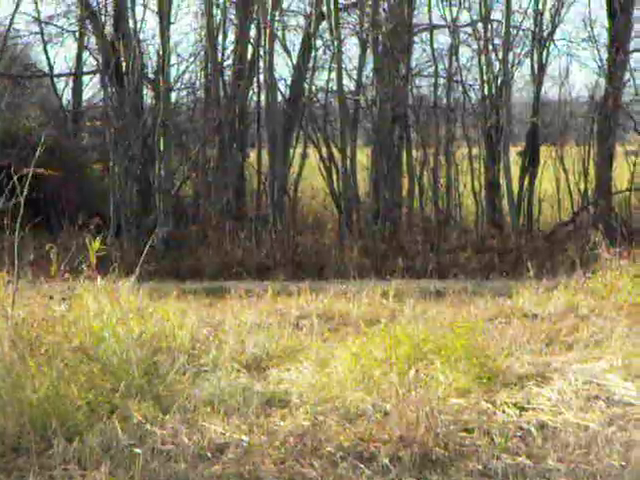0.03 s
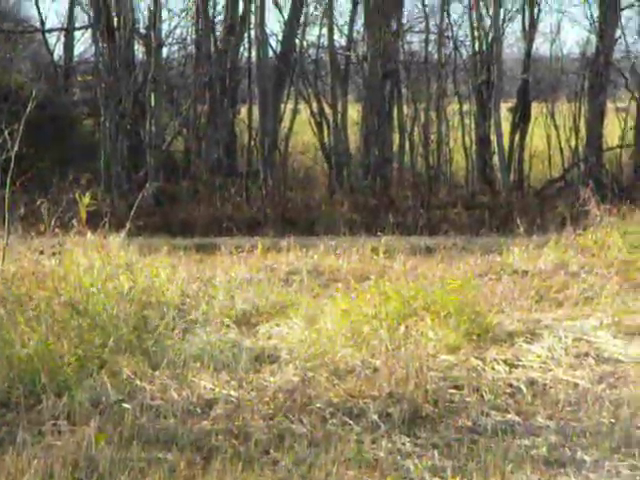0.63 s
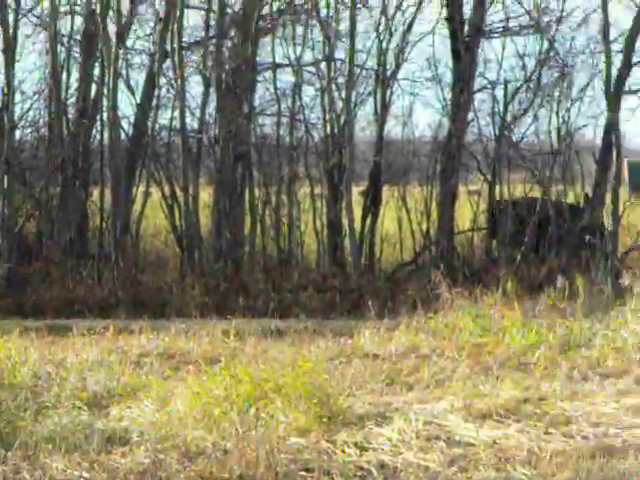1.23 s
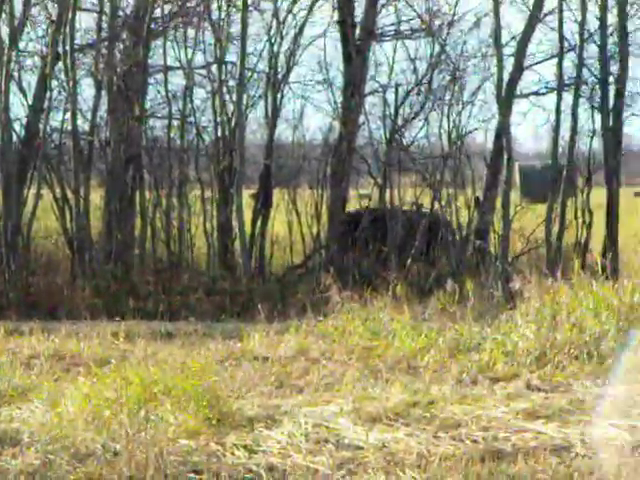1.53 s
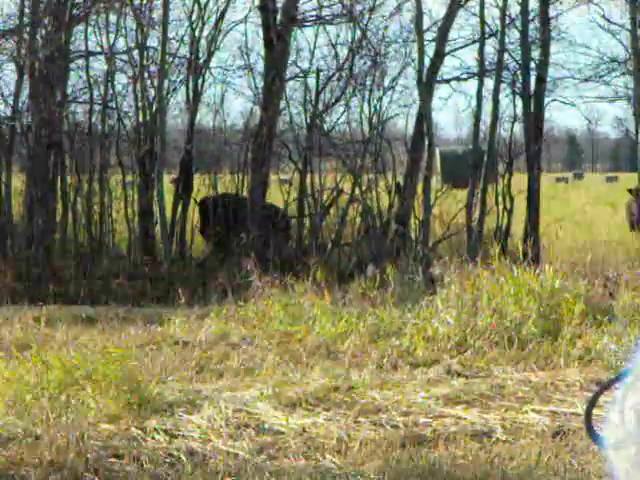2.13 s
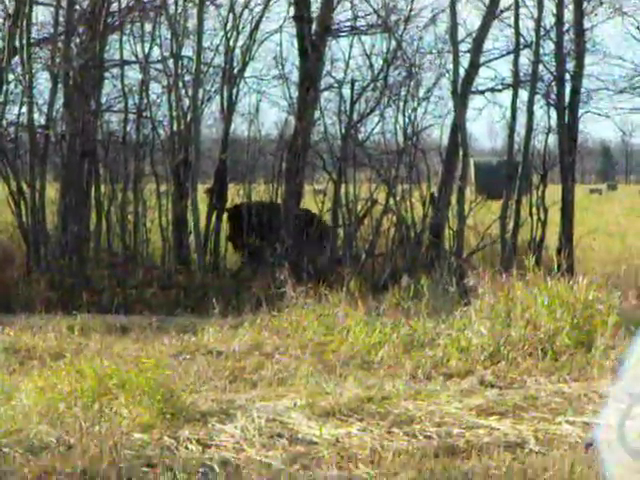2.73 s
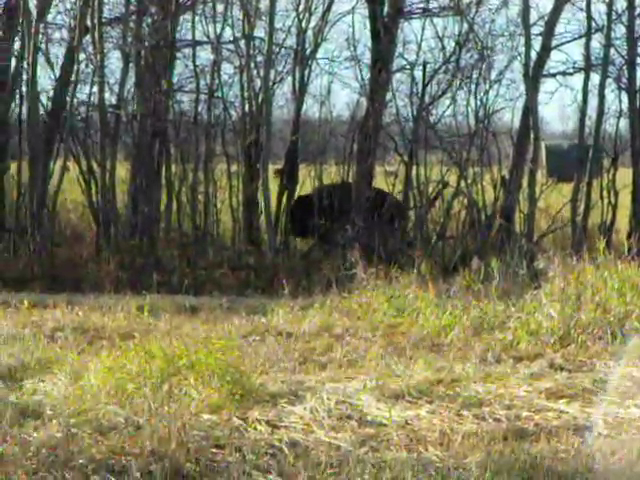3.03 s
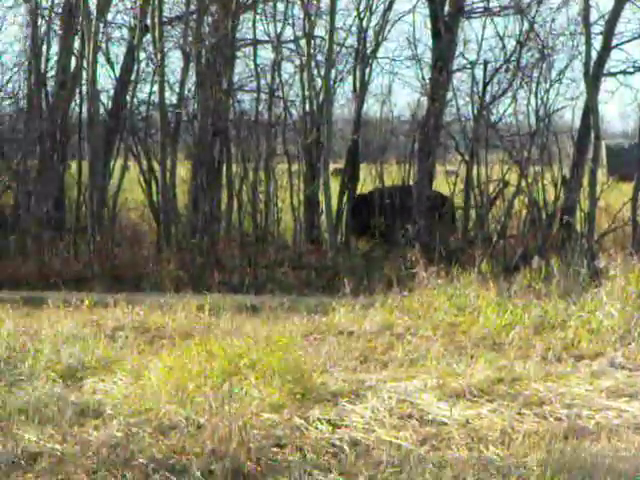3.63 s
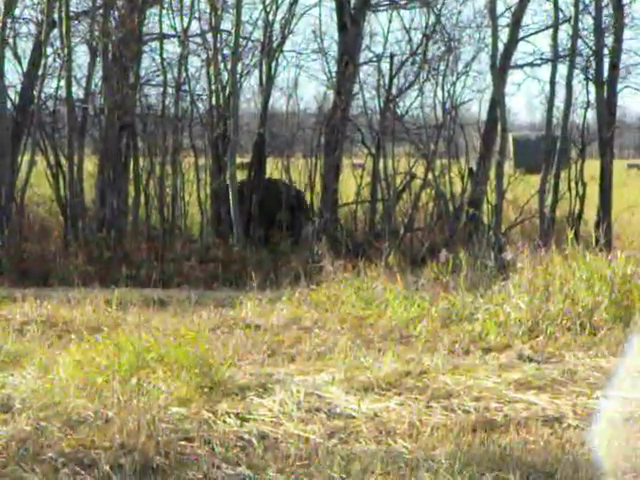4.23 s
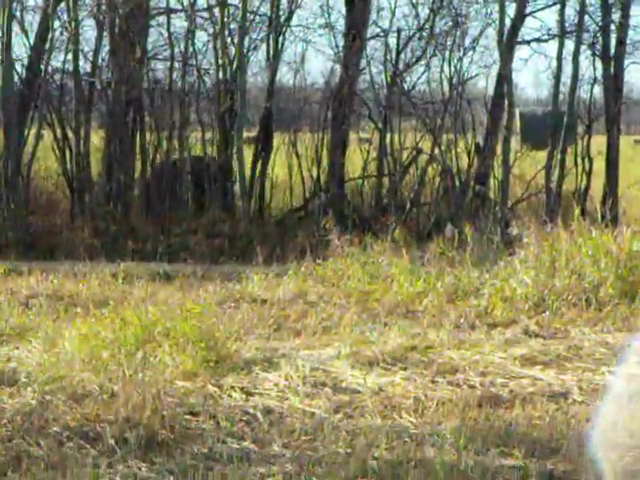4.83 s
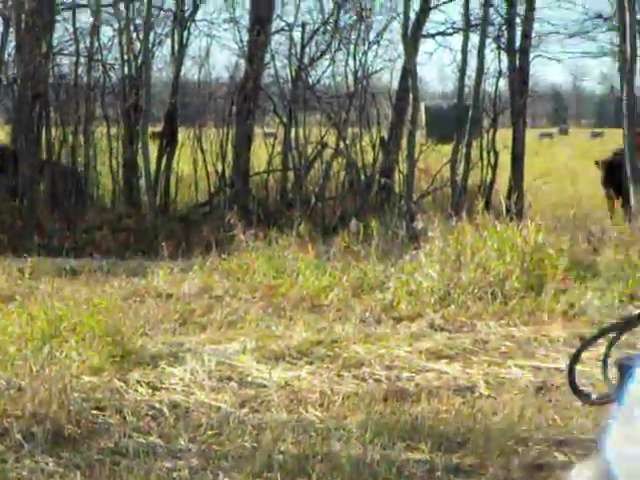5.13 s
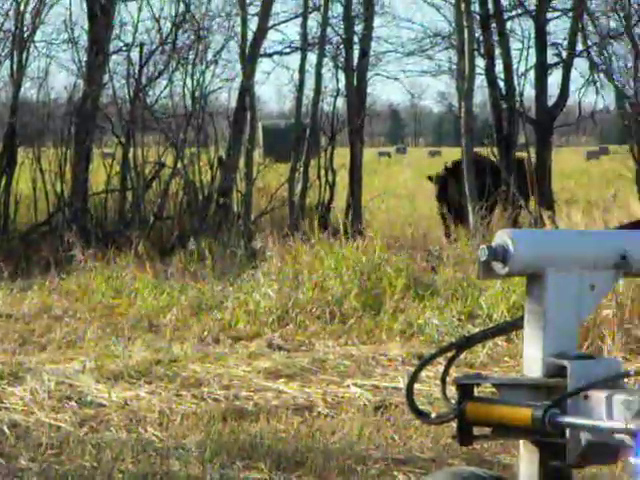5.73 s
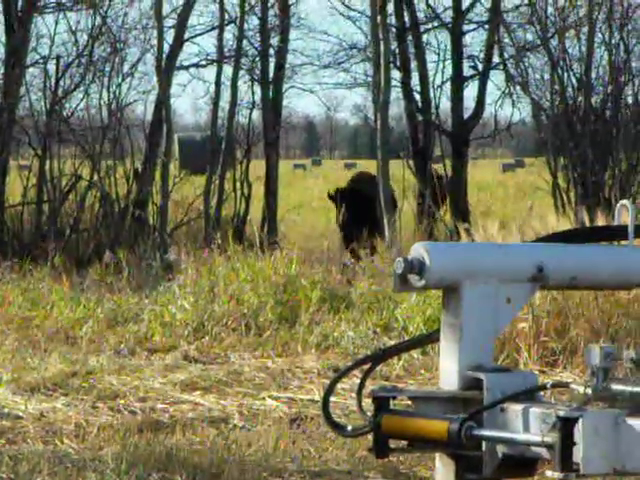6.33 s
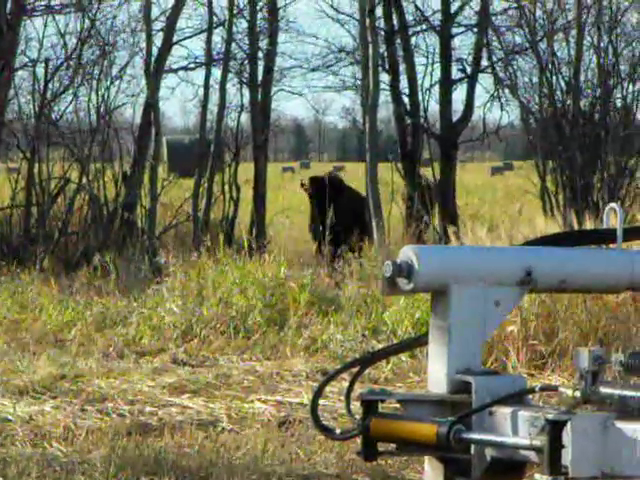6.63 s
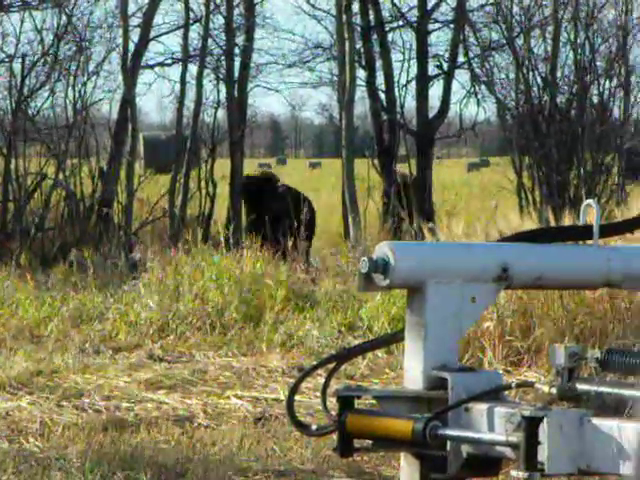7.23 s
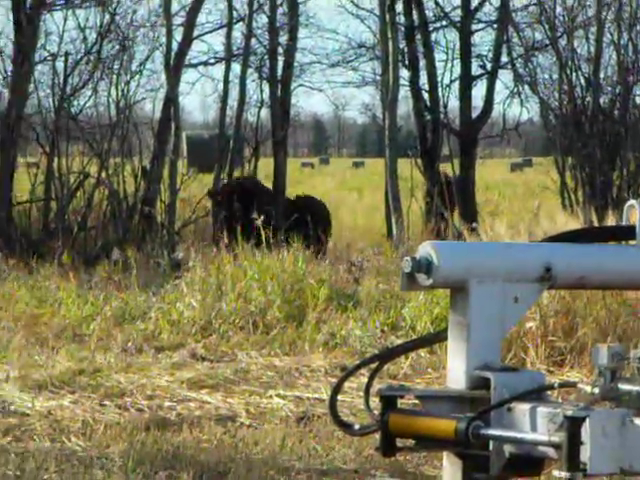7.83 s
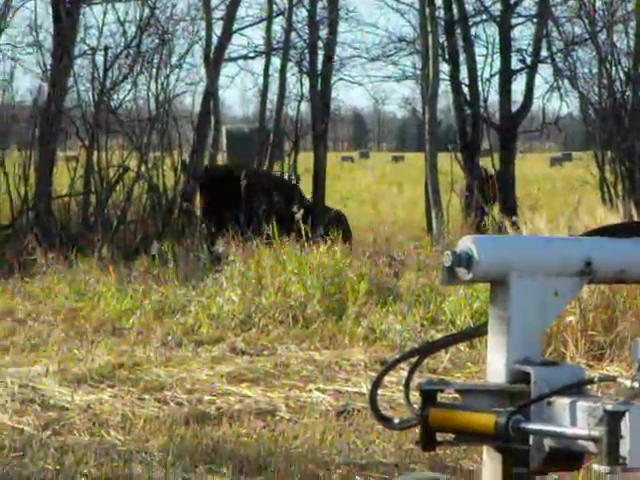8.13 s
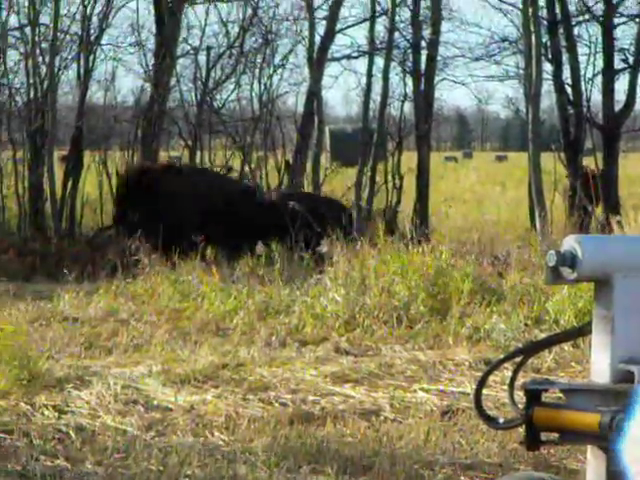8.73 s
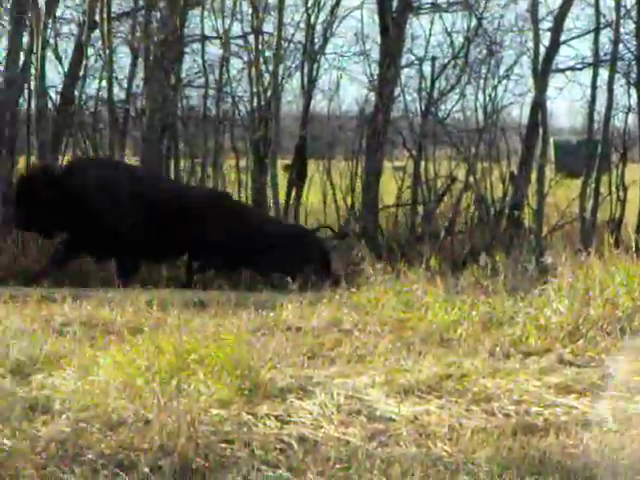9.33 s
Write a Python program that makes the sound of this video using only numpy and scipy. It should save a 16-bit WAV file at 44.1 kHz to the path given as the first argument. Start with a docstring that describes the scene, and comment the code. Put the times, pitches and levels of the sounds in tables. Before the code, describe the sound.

Constant, slightly buzzy microphone hiss and a faint high whine nearly cover a quiet open field, where light air rumbles now and then. A pop and a quick cluster of plastic clicks open the sound, right at the hand-held camera. Scattered ticks and small finger scuffs follow, then a catch snaps hard enough to distort. The second half holds only hiss, gentle gusts and one tiny squeak. Everything is dry, with dulled treble.

```python
"""A sharp pop as a small hand-held camera wakes, then its own hiss, which nearly covers a still field.
The hiss dips once for each half-picture the camera scans, which gives it a faint buzz,
and a thin electronic whine rides on it. Light air rumbles now and then. Fingers make the
plastic case tick and creak, and once a catch snaps hard enough to overload the input."""
import sys
import numpy as np
from scipy import signal
from scipy.fft import rfft, irfft, next_fast_len
from scipy.io import wavfile

SR = 44100
rng = np.random.default_rng(int(sys.argv[2]) if len(sys.argv) > 2 else 0)


def put_to_file(sound):
    """Save the sound as 16-bit audio at rate SR, in the file named by the first command-line argument."""
    columns = np.atleast_2d(sound).T  # one column per channel
    safe = np.clip(columns, -1, 1)
    whole_steps = np.round(safe * 32767)
    wavfile.write(sys.argv[1], SR, whole_steps.astype(np.int16))


N = 418509
T = np.arange(N) / SR


def amp(db):
    """Turn decibels into a gain to multiply by."""
    return 10 ** (np.asarray(db) / 20)


def tone_curve(points, hz):
    """Gain at hz, read from a curve through (pitch_hz, level_db) points."""
    pitch_hz, level_db = np.transpose(points)
    return amp(np.interp(np.log(hz + 1), np.log(pitch_hz + 1), level_db))


def band(hz, centre_hz, octaves):
    """Gain that is flat around a centre pitch and falls away on both sides."""
    return 1 / np.sqrt(1 + (np.log2((hz + 1) / centre_hz) / octaves) ** 6)


def filtered(sound, gain_at):
    """Turn each frequency of a sound up or down by gain_at(hz)."""
    size = next_fast_len(len(sound) + SR // 10)
    gains = gain_at(np.fft.rfftfreq(size, 1 / SR))
    return irfft(rfft(sound, size) * gains, size)[:len(sound)]


def noise(gain_at, size):
    """Noise shaped by gain_at(hz), with an average (rms) level of 1."""
    shaped = filtered(rng.standard_normal(size), gain_at)
    return shaped / np.sqrt(np.mean(shaped ** 2) + 1e-20)


def fade(t, fade_s):
    """Die away by 60 dB every fade_s seconds."""
    return np.exp(-np.log(1000) * t / fade_s)


def add(track, start_s, sound):
    """Mix a sound into the track at start_s."""
    part = track[round(start_s * SR):][:len(sound)]
    part += sound[:len(part)]


def air(calm_db=-58.5, rise_s=0.16, fall_s=0.2, start_s=0.04):
    """Puffs of air reach the microphone as soft, low swells over a steady drift."""
    # the puffs: peak_s, level_db
    puffs = [(1.72, -48), (5.62, -45), (6.92, -51.5), (7.97, -46), (8.93, -49)]
    # the tone of the rumble: pitch_hz, level_db
    rumble_tone = [(20, -14.5), (55, -9), (85, -3.5), (145, -3.5), (230, -11), (370, -5.5), (480, -19),
                   (1500, -20), (4000, -47.5)]
    power = amp(calm_db) ** 2
    for peak_s, level_db in puffs:
        width_s = np.where(T < peak_s, rise_s, fall_s)
        swell = amp(level_db) * np.exp(-((T - peak_s) / width_s) ** 2)
        power = power + swell ** 2
    rumble = noise(lambda hz: tone_curve(rumble_tone, hz), N)
    return np.sqrt(power) * rumble * (T > start_s)


def camera_hiss(level_db=-38.5, scan_hz=59.94, dip_share=0.085, dip_db=-11, waking_db=-11):
    """The circuits hiss and whine; the hiss dips briefly between scans, so it buzzes."""
    # the tone of the hiss: pitch_hz, level_db
    hiss_tone = [(20, 1), (150, 0), (600, 0.5), (1500, 0.7), (3000, 0.3), (5000, 0.5), (8000, 0)]
    # steady whistles of the electronics: pitch_hz, level_db
    whistles = [(701, -67), (5012, -55), (6014, -58)]
    top_hz = hiss_tone[-1][0]
    hiss = noise(lambda hz: tone_curve(hiss_tone, hz) * (hz < top_hz), N)
    dips = np.where(T * scan_hz % 1 < dip_share, amp(dip_db), 1)
    whine = sum(np.sqrt(2) * amp(db) * np.sin(2 * np.pi * hz * T) for hz, db in whistles)
    # the input wakes in two steps
    waking = np.interp(T, [0.038, 0.04, 0.093, 0.097], [0, amp(waking_db), amp(waking_db), 1])
    return (amp(level_db) * dips * hiss + whine) * waking


def power_pop(start_s=0.0382):
    """The microphone's power comes on with one sharp push, swings below zero and creeps back."""
    track = np.zeros(N)
    push = amp(-3) * fade(T, fade_s=0.00091)
    swing = amp(-26) * fade(T, fade_s=0.034)
    sag = amp(-36) * fade(T, fade_s=3.1)
    add(track, start_s, push + swing - sag)
    return track


def finger_rubs():
    """A fingertip drags on the case in short scuffs; those with a narrow pitch range squeak."""
    # the scuffs: start_s, length_s, level_db, pitch_hz, width_octaves
    scuffs = [(1.117, .17, -42.5, 2500, .7), (3.482, .014, -34, 2300, 0.46),
              (3.499, 0.0091, -24.5, 2270, 0.18), (3.508, 0.011, -30, 1600, 0.83),
              (6.815, 0.045, -44, 1480, .12)]
    track = np.zeros(N)
    for start_s, length_s, level_db, pitch_hz, octaves in scuffs:
        stroke = signal.windows.tukey(int(length_s * SR))  # fade in, hold, fade out
        friction = noise(lambda hz: band(hz, pitch_hz, octaves), len(stroke))
        add(track, start_s, amp(level_db) * stroke * friction)
    return track


def case_ticks(grit=0.35, attack_s=0.0004, scatter_db=3.0, knock_hz=325, knock_db=-28):
    """Each slip of a seam rings the case's notes near its own pitch, with grit and a dull knock."""
    # slips under the fingers: start_s, level_db, pitch_hz, fade_s
    slips = [(0.108, -18.5, 900, 0.012), (0.3335, -5, 1050, 0.016), (0.389, -3, 940, 0.029),
             (0.430, -21, 400, 0.014), (0.4735, -22, 1600, .027), (0.5173, -18.5, 1150, 0.021),
             (0.521, -6.5, 2180, 0.018), (1.122, -22.5, 2600, 0.04), (2.679, -29.5, 726, 0.044),
             (2.821, -30.5, 700, 0.034), (2.950, -24, 780, 0.037), (3.069, -17.5, 830, .034),
             (3.3545, -12.5, 3950, 0.021), (3.4224, -13, 2050, 0.028), (3.5171, -15, 1600, 0.032),
             (3.646, -29, 1150, .03), (3.825, -26, 2100, .03), (3.943, -22.5, 2300, .02),
             (4.4747, -23, 2200, .018), (4.526, -4, 2300, 0.031)]
    # the notes the case rings at: pitch_hz, level_db, fade_ratio (times the slip's fade_s)
    case_notes = [(325, -9, 2.1), (670, -11, 1.5), (1043, -1.5, 0.97), (1268, -10.5, 0.96),
                  (1748, -5, 0.87), (2296, -4, 0.991), (2840, -12.5, 0.76), (3200, -11.5, 0.6),
                  (3785, -8.5, 0.68), (5175, -7, 0.4)]
    # a harder slip sets more of the case ringing: level_db, width_octaves
    slip_widths = [(-28, 0.42), (-21, 1)]
    track, t = np.zeros(N), np.arange(SR // 10) / SR
    note_hz, note_db, fade_ratio = np.transpose(case_notes)[:, :, None]
    signs = (-1) ** np.arange(len(case_notes))[:, None]  # neighbouring notes swing opposite ways
    notes = signs * np.sin(2 * np.pi * note_hz * t)
    knock = amp(knock_db) * np.sin(2 * np.pi * knock_hz * t) * fade(t, fade_s=0.04)
    for start_s, level_db, pitch_hz, fade_s in slips:
        octaves = np.interp(level_db, *np.transpose(slip_widths))
        varied_db = note_db + scatter_db * rng.standard_normal(note_hz.shape)
        strength = amp(varied_db) * band(note_hz, pitch_hz, octaves)
        ring = np.sum(strength * notes * fade(t, fade_s * fade_ratio), axis=0)
        crunch = noise(lambda hz: band(hz, pitch_hz, octaves), len(t)) * fade(t, fade_s)
        tick = (ring + grit * np.linalg.norm(strength) * crunch) * (1 - np.exp(-t / attack_s))
        add(track, start_s, amp(level_db) * (tick / np.abs(tick).max() + knock))
    return track


def catch_snap(attack_s=0.000384, thud_hz=400, rattle_hz=1400):
    """A catch snaps shut and bounces; each hit rings it, with a crack, a thud and a case rattle."""
    # the hit and its bounce: start_s, gain_db, pitch_hz, width_octaves
    hits = [(4.5315, 6, 1800, 1.18), (4.5346, 4, 4400, 0.89)]
    # the notes the catch rings at: pitch_hz, level_db, fade_s
    catch_notes = [(628, -14.5, 0.063), (730, -35.5, .15), (836, -19, 0.048), (894, -27.5, .06),
                   (1036, -13, 0.027), (1330, -13, 0.032), (1478, -14, 0.027), (1820, -28.5, 0.19),
                   (2017, -4.5, 0.028), (2110, -24.5, .09), (2355, -20, .06), (2525, -13.5, 0.028),
                   (2837, -27, .07), (3314, -11, 0.021), (3686, -7.5, .02), (4720, -13.5, 0.011),
                   (4990, -8.5, 0.021), (5580, -3.5, 0.013)]
    track, t = np.zeros(N), np.arange(SR // 4) / SR
    onset = 1 - np.exp(-t / attack_s)
    for start_s, gain_db, pitch_hz, octaves in hits:
        hit_tone = lambda hz: band(hz, pitch_hz, octaves)
        ring = sum(amp(level_db) * hit_tone(hz) * np.sin(2 * np.pi * hz * t) * fade(t, fade_s)
                   for hz, level_db, fade_s in catch_notes)
        crack = amp(-10) * noise(hit_tone, len(t)) * fade(t, fade_s=0.019)
        thud = amp(-27) * noise(lambda hz: band(hz, thud_hz, 1.3), len(t)) * fade(t, fade_s=0.033)
        rattle = amp(-31) * noise(lambda hz: band(hz, rattle_hz, 1.2), len(t)) * fade(t, fade_s=0.13)
        add(track, start_s, amp(gain_db) * (ring + crack + thud + rattle) * onset)
    return track


def scene():
    """Everything reaches the one microphone with no echo."""
    return (camera_hiss() + air() + case_ticks() + finger_rubs() + catch_snap() + power_pop())[None]


def record(dry, ceiling_db=-2.0, top_hz=15500):
    """The input cuts the high treble; only overload, which flattens the peaks, adds higher sound."""
    # what the input lets through: pitch_hz, gain_db
    input_tone = [(4900, 0), (5200, -1.5), (5500, -7.5), (5800, -15), (6100, -26.5), (6400, -57.5),
                  (7000, -91)]
    muffled = filtered(dry[0], lambda hz: tone_curve(input_tone, hz))
    flattened = np.clip(muffled, -amp(ceiling_db), amp(ceiling_db))
    return filtered(flattened, lambda hz: 1 / np.sqrt(1 + (hz / top_hz) ** 100))[None]


dry = scene()
out = record(dry)
put_to_file(out)
```